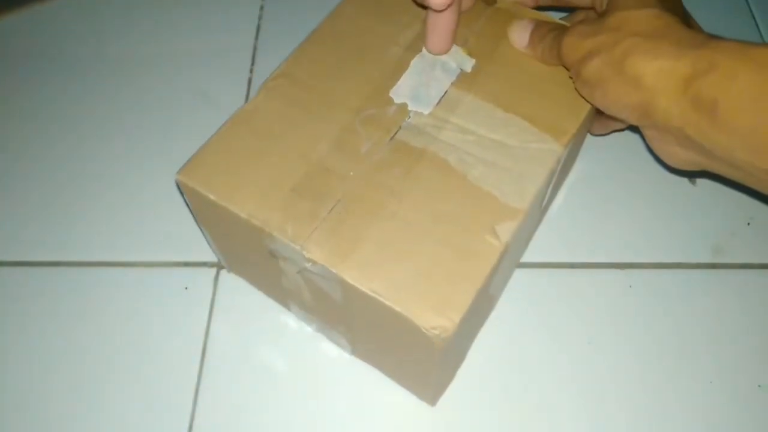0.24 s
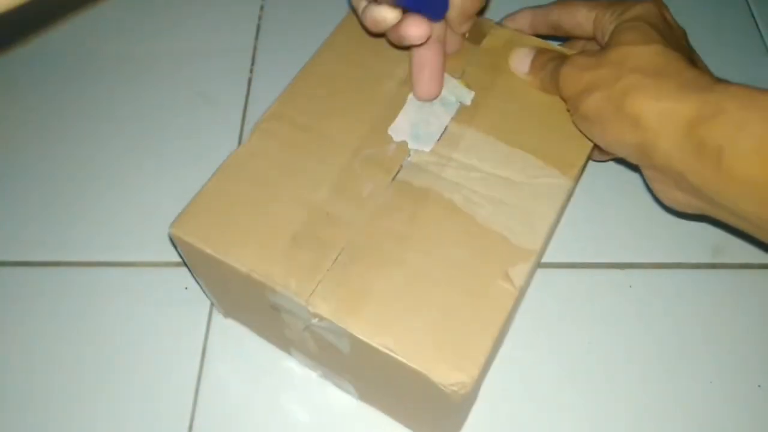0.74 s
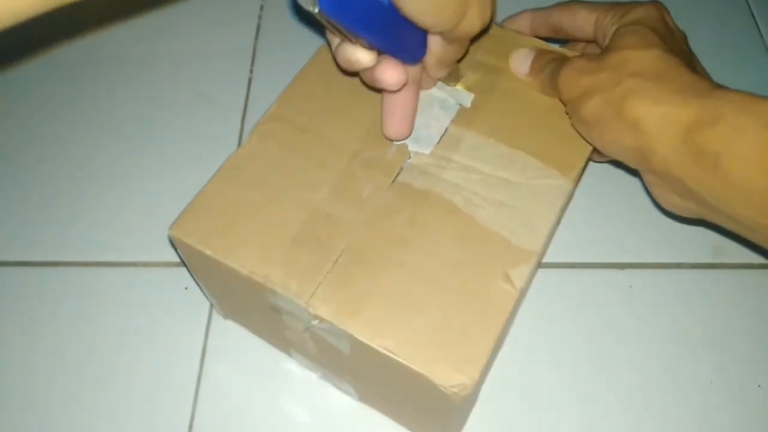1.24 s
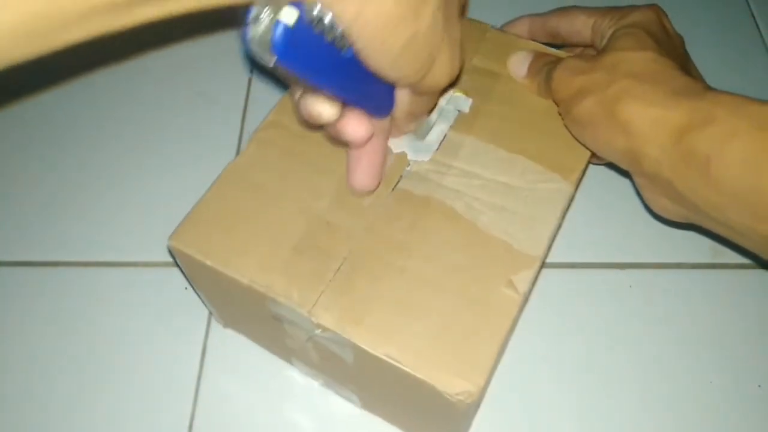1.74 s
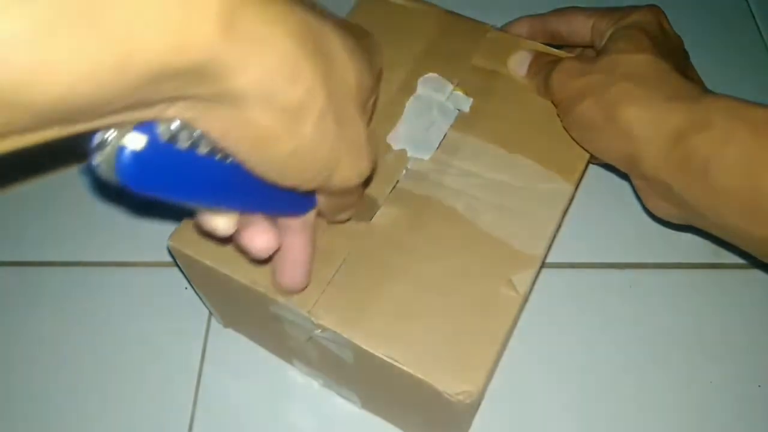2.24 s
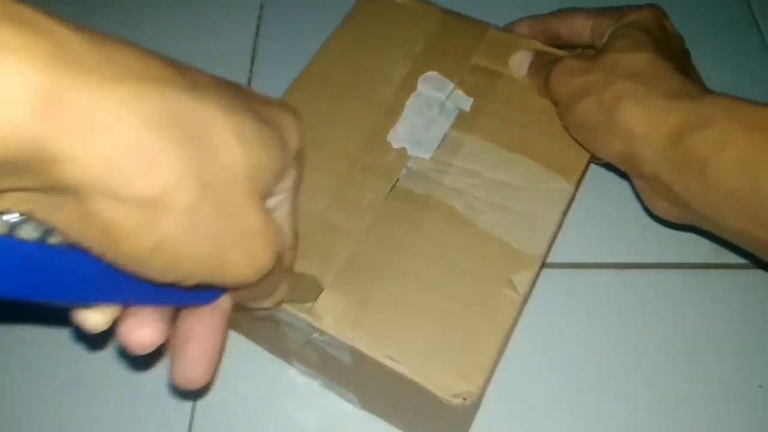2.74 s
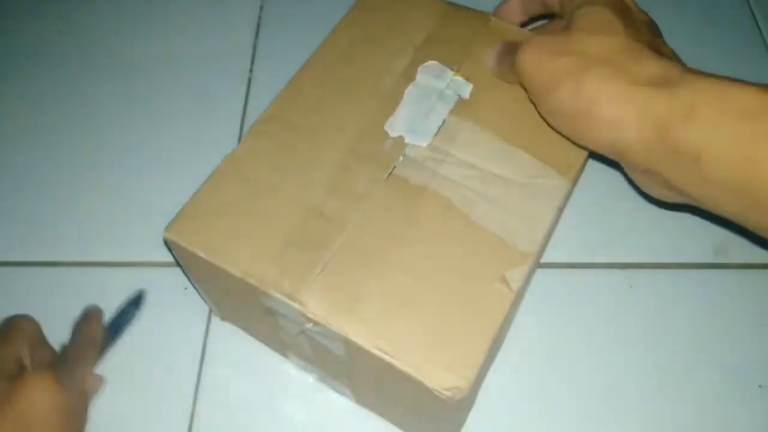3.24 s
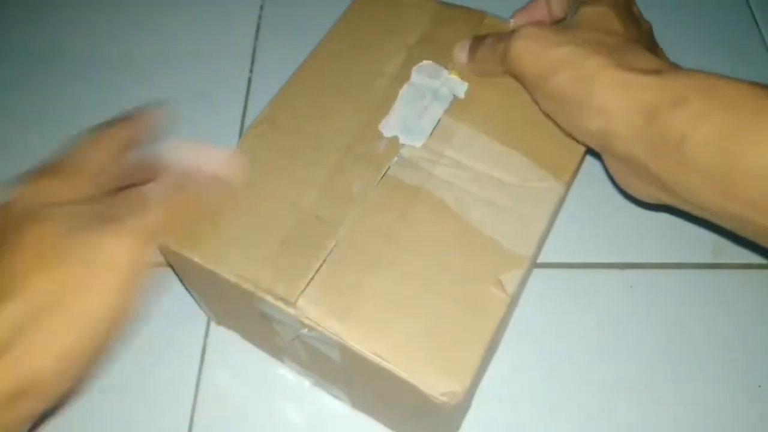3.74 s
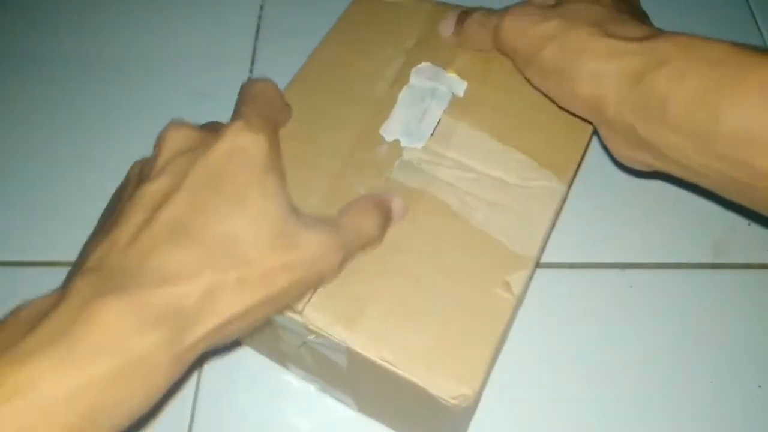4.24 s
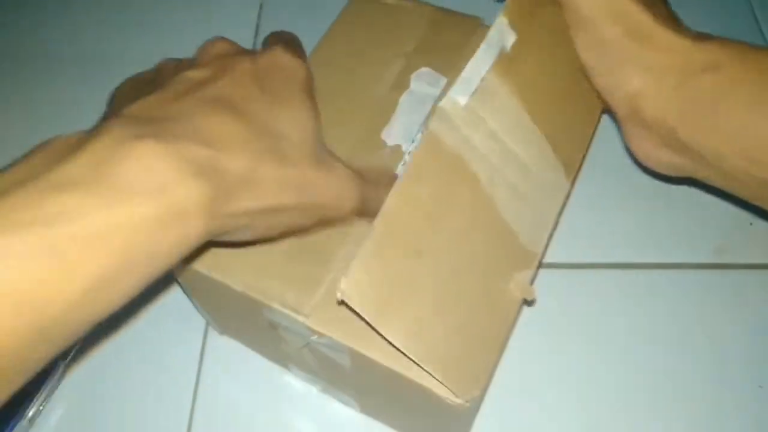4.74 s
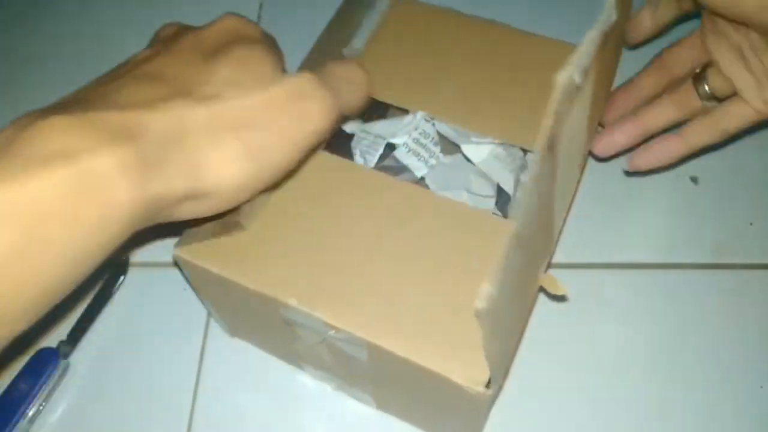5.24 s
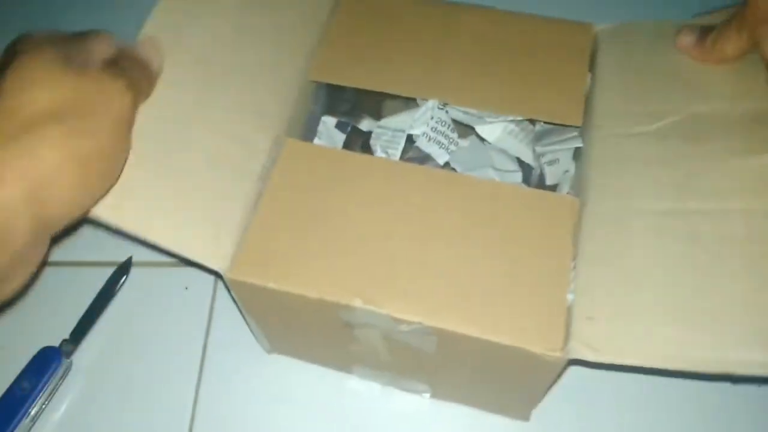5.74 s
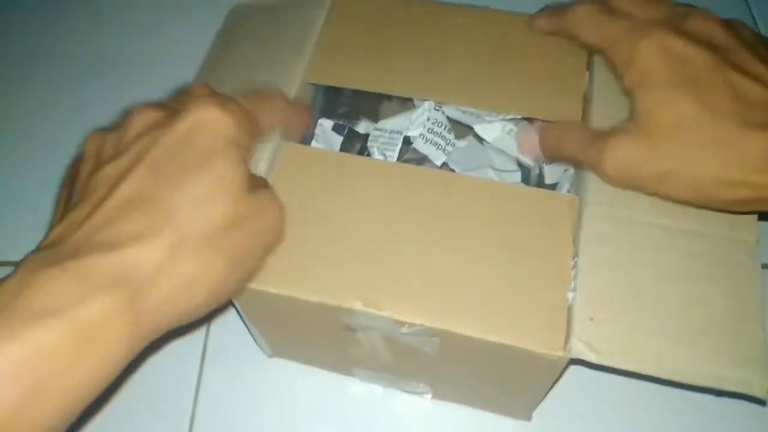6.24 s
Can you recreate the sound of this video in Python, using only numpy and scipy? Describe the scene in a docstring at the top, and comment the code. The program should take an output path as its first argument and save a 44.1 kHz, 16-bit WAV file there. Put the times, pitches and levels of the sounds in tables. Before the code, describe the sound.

Close up in a small, hard tiled room, a knife jabs the taped seam of a hollow cardboard box with dull knocks and crisp snaps, then slits it in coarse, crackling bursts. The blade clicks onto the floor, the last tape gives way with a loud boxy pop, flaps fold back with light papery scrapes, and hands slide across the card. Quiet room noise and a low hum remain.

```python
"""Opening a taped cardboard box

A box is opened on a tiled floor in a small hard room, close to the microphone. A craft knife jabs the tape,
slits the seam and is laid on the tiles; the last tape pops, the flaps fold back and hands slide over the card.
Blows are dying vibrations and noise bursts, friction is a stream of tiny slips, and faint whistling noise
glides in moving resonances. Faint hollow tones, quiet room noise and a low hum lie behind.
"""
import sys
import numpy as np
from scipy import signal
from scipy.fft import rfft, irfft
from scipy.io import wavfile
from scipy.ndimage import uniform_filter1d

SR = 44100
rng = np.random.default_rng(int(sys.argv[2]) if len(sys.argv) > 2 else 0)


def materialize(psi):
    """Save the field psi as 16-bit PCM at rate SR to the path in sys.argv[1].

    A 1-D psi becomes a single channel; in a 2-D psi each row is a channel.
    """
    bounded = np.clip(np.atleast_2d(psi).T, -1, 1)
    quanta = np.round(bounded * 32767).astype(np.int16)
    wavfile.write(sys.argv[1], SR, quanta)


N = 286209  # length of the scene in samples


def knocks(thump_db=-1, panel_db=-1, crack_db=-2, snap_db=0, thump_t60=0.037, deep_hz=200, deep_power=1.2,
           panel_t60=0.013, ring_db=3, edge_hz=2270, edge_t60=0.013, edge_db=1, buckle_db=-32,
           crackle_db=-7, low_room_db=-10, high_room_db=-5):
    """Each blow bends a wall (thump), rings a stiff panel, cracks fibres and snaps tape, amid a crackle."""
    # jabs, pops and bumps, levels before the trims above: [t/s, time the force takes to build/s, thump f/Hz,
    # thump level/dB, panel f/Hz, panel level/dB, crack level/dB, tape snap level/dB]
    blows = [(0.175, 0.0014, 260, -64.5, 567, -71.5, -99, -99),
             (0.325, 0.000064, 273, -89, 690, -81, -57, -63), (0.5494, 0.001, 352, -37, 800, -47, -39, -48),
             (1.094, 0.0038, 230, -47.5, 916, -56, -58, -57),
             (1.176, 0.0029, 239, -50.5, 960, -59, -57, -58.5),
             (1.3169, 0.00013, 396, -54, 835, -41.5, -44, -57),
             (1.325, 0.0024, 276, -46.5, 695, -54, -57, -57.5),
             (1.5458, 0.0009, 233, -39.5, 726, -42.5, -44.5, -46),
             (1.561, 0.002, 286, -41.5, 606, -48, -48.5, -50),
             (1.578, 0.0034, 246, -46.5, 535, -47.5, -52, -50.5),
             (1.99, 0.00044, 232, -42.5, 830, -62, -59, -69),
             (2.1117, 0.00017, 317, -47, 840, -38.5, -43.5, -42),
             (2.121, 0.0021, 205, -43.5, 790, -63, -65, -58),
             (2.216, 0.00067, 424, -47, 800, -52.5, -55.5, -55.5),
             (2.6604, 0.0014, 370, -42, 998, -32, -38, -42),
             (2.759, 0.0025, 403, -44, 993, -35.5, -41, -42.5),
             (2.772, 0.0017, 347, -47, 1018, -36, -44, -47),
             (2.963, 0.0014, 237, -36, 696, -58, -49, -42.5),
             (2.977, 0.0018, 240, -29.5, 814, -59.5, -49.5, -41.5),
             (3.721, 0.00054, 258, -46, 674, -66, -45, -67.5),
             (4.0235, 0.0012, 156, -33, 870, -71, -55, -49),
             (4.371, 0.0009, 326, -40, 753, -46.5, -48, -51),
             (4.387, 0.0011, 383, -41, 600, -59.5, -57.5, -58.5),
             (4.5101, 0.00012, 189, -22.5, 778, -37.5, -32.5, -34),
             (4.528, 0.0031, 140, -31, 465, -43.5, -46.5, -57.5),
             (4.572, 0.0048, 260, -42.5, 534, -54, -57.5, -52.5),
             (4.753, 0.00029, 322, -40, 630, -77, -57, -54), (4.97, 0.0027, 210, -46, 737, -69.5, -61, -63),
             (6.276, 0.0042, 267, -43.5, 820, -52, -59, -68)]
    # colour of cracking cardboard: [f/Hz, relative level/dB]
    crack_colour = [(300, -8), (1000, -6), (1600, -13), (2350, -7), (2900, -16), (3800, -15), (5500, -21.5),
                    (9000, -28.5)]
    # colour of snapping tape: [f/Hz, relative level/dB]
    snap_colour = [(2000, -61), (5000, 3), (10000, 9.5), (13000, 11), (16000, 4.5)]
    low, high, pops = np.zeros((3, N))
    for s, push_s, thump_hz, thump, panel_hz, panel, crack, snap in blows:
        # deep thumps last longer
        decay_s = thump_t60 * (deep_hz / thump_hz) ** deep_power
        blow = amp(thump + thump_db) * ring(thump_hz, decay_s, push_s, sag_share=0.22)
        blow -= amp(panel + panel_db) * ring(panel_hz, panel_t60 + 3 * push_s, push_s, sag_share=0.11)
        add(blow, 0, amp(crack + crack_db) * burst(crack_colour, 0.00039 + 3 * push_s, push_s))
        add(low, s, box(blow, ring_db))
        add(high, s, amp(snap + snap_db) * burst(snap_colour, 0.00018 + 0.48 * push_s, push_s))
        specks = amp(crack) * crackle(crack_colour) + amp(snap) * crackle(snap_colour)
        add(high, s - len(specks) / 2 / SR, amp(crackle_db) * specks)
        # the flap's stiff edge gives a short, dry pop, weakened further when the crack is below buckle_db
        pop_db = crack + edge_db + min(crack - buckle_db, 0)
        add(pops, s, amp(pop_db) * ring(edge_hz, edge_t60, push_s))
    # a small box radiates little deep bass
    low = signal.sosfilt(signal.butter(2, 80, "high", fs=SR, output="sos"), low)
    return ports(low + high + pops) + room(amp(low_room_db) * low + amp(high_room_db) * high)


def ring(hz, t60, rise_s, sag_share=0, sag_s=0.0048):
    """A dying vibration with a soft start; a struck wall slackens, so its pitch can sink through hz."""
    t = np.arange(SR // 3) / SR
    pitch_hz = hz * (1 + sag_share * (np.exp(-t / sag_s) - .5))
    turns = np.cumsum(pitch_hz) / SR
    return unit(np.sin(2 * np.pi * turns) * amp(-60 * t / t60) * (1 - np.exp(-t / rise_s)))


def burst(colour, decay_s, rise_s, size=4096):
    """A swelling, dying spray of dense noise, coloured like a click of the given colour."""
    t = np.arange(size) / SR
    spray = rng.standard_normal(size) * np.exp(-t / decay_s) * (1 - np.exp(-t / rise_s)) ** 2
    return unit(signal.fftconvolve(spray, click(colour))[:size])


def crackle(colour, swell_s=0.0055, fade_s=0.0088, specks_per_s=1500, size=8192):
    """A sparse crackle swells and fades around each blow, which falls in the middle."""
    t = (np.arange(size) - size // 2) / SR
    specks = rng.standard_normal(size) * (rng.random(size) < specks_per_s / SR)
    specks *= np.exp(np.minimum(t / swell_s, -t / fade_s))
    return unit(signal.fftconvolve(specks, click(colour))[:size])


def click(colour, size=4096):
    """One click of the given colour that starts at once, with no sound ahead of it (minimum phase)."""
    log_gain = np.log(amp(read(colour, abs(np.fft.fftfreq(size, 1 / SR)))))
    return unit(np.fft.ifft(np.exp(np.conj(signal.hilbert(log_gain)))).real)


def box(x, ring_db, place_db=1.0, flex_share=0.055):
    """Walls and inside air ring along; random mode levels and pitches stand for the place touched."""
    # ringing modes of the box: [f/Hz, relative level/dB, time to fall by 60 dB/s]
    box_modes = [(127.4, -4, 0.3), (186, -6, 0.078), (291.6, -1.5, 0.1), (406.3, 2, 0.096),
                 (478, 3.5, 0.21), (524, 0.5, 0.47), (746, -6.5, 0.025), (944, -8, 0.074)]
    t = np.arange(SR // 2) / SR
    ringing = np.zeros(len(t))
    for hz, db, t60 in box_modes:
        fade = amp(db + place_db * rng.uniform(0.22, 1) - 60 * t / t60)
        mode_hz = hz * (1 + flex_share * rng.uniform(-1.16, 1))
        ringing += fade * np.cos(2 * np.pi * mode_hz * t) / t60
    # with the division by t60, each mode's resonant gain follows its level, however long it rings
    scale = 2 * np.log(1000) / SR
    return x + amp(ring_db) * scale * signal.fftconvolve(x, ringing)[:len(x)]


def blade():
    """The blade slits the seam; tape fibres part in small bundles, which makes a coarse crackle."""
    # pulls, levels before easing: [t/s, length/s, time to bite/s, box drone level/dB, hiss level/dB]
    pulls = [(1.802, 0.034, 0.0052, -40, -48), (1.866, 0.098, 0.012, -47, -50),
             (2.077, 0.028, 0.0022, -44.5, -49.5), (2.18, 0.25, .02, -77, -101),
             (2.45, 0.58, 0.063, -67, -64.5), (2.625, 0.12, 0.02, -56, -64.5),
             (2.734, 0.027, 0.0046, -54.5, -59), (2.842, 0.058, 0.013, -52.5, -52.5)]
    # colour of cutting: [f/Hz, relative level/dB]
    cut_colour = [(100, -96.5), (175, -1), (290, 15.5), (420, -5), (600, -9), (900, -1), (1420, -17.5),
                  (2380, -12), (3300, -20.5), (4400, -26.5), (7300, -20.5), (12000, -10), (16000, -20.5)]
    strengths = pressed(pulls, ease_db_per_s=2.5, release_s=0.058, rasp_db=-9)
    return friction(strengths, cut_colour, slips_per_s=260, slip_s=0.00084, spread_db=3.0, smooth=0.14,
                    catch_db=2.0, shift_db=1.5, room_db=-1.0)


def rubs():
    """Blade tip, fingers and folding flaps rub the cardboard in short strokes of many brief slips."""
    # strokes, levels before easing: [t/s, length/s, time to bite/s, box drone level/dB, hiss level/dB]
    rub_strokes = [(.485, 0.42, 0.018, -78.5, -62.5), (1.05, 0.21, 0.021, -68, -69),
                   (3.362, 0.0081, 0.0048, -82, -68), (3.54, 0.092, 0.0048, -66.5, -84),
                   (3.78, 0.24, 0.003, -61, -75.5), (4.0, 0.089, 0.007, -69, -62),
                   (4.36, 0.22, 0.0056, -71.5, -60.5), (4.58, 0.13, 0.1, -77, -68.5),
                   (4.96, 0.093, 0.011, -66.5, -53.5), (5.2, 0.099, 0.0088, -89.5, -64),
                   (5.308, 0.0079, 0.0095, -85, -62), (5.41, 0.27, 0.005, -71, -55),
                   (5.803, 0.15, 0.011, -69.5, -50.5), (6.0, 0.14, 0.027, -68.5, -92)]
    # colour of rubbing: [f/Hz, relative level/dB]
    rub_colour = [(100, -3.5), (180, -13), (320, 5.5), (500, -12), (2100, -12.5), (4300, -21.5),
                  (7450, -18.5), (12900, -8), (16000, -18)]
    strengths = pressed(rub_strokes, ease_db_per_s=10.0, release_s=0.027, rasp_db=-11.5)
    return friction(strengths, rub_colour, slips_per_s=890, slip_s=0.0003, spread_db=6.5, smooth=0.22,
                    catch_db=3.0, shift_db=0.5, room_db=1.5)


def hands():
    """Hands slide onto the inner flaps in quick, growing pushes; dense slips make a smoother rub."""
    # pushes, levels before growth: [t/s, length/s, time to bite/s, box drone level/dB, hiss level/dB]
    pushes = [(6.18, .11, 0.038, -69.5, -58.5), (6.235, .055, 0.019, -46.5, -64),
              (6.31, .34, 0.013, -58.5, -66.5)]
    # colour of sliding hands: [f/Hz, relative level/dB]
    slide_colour = [(60, -5), (130, 0.5), (290, -7.5), (535, -22.5), (800, -9), (1550, -13), (3300, -15),
                    (4200, -9.5), (6150, -21), (11900, 8), (16000, 8)]
    strengths = pressed(pushes, ease_db_per_s=-4, release_s=0.014, rasp_db=2.5)
    return friction(strengths, slide_colour, slips_per_s=2100, slip_s=0.0007, spread_db=4.0, smooth=0.71,
                    catch_db=0.5, shift_db=2.0, room_db=-5)


def pressed(strokes, ease_db_per_s, release_s, rasp_db):
    """Strengths of drone, rasp and hiss: each stroke bites, eases off (or grows if negative), lets go."""
    t, out = np.arange(SR) / SR, np.zeros((3, N))
    for s, length_s, bite_s, drone, hiss in strokes:
        force = np.minimum(t / bite_s, 1) ** 2 * amp(-ease_db_per_s * t)
        force *= np.exp(-np.maximum(t - length_s, 0) / release_s)
        # the rasp is set from the midpoint of the other two
        rasp = (drone + hiss) / 2 + rasp_db
        add(out, s, amp([[drone], [rasp], [hiss]]) * force)
    return out


def friction(strengths, colour, slips_per_s, slip_s, spread_db, smooth, catch_db, shift_db, room_db):
    """Stick and slip: uneven little slips, each a short tearing of fibres, shake the box, rasp and hiss."""
    slip_db = spread_db * np.minimum(rng.exponential(1, N), 3)
    energy = amp(slip_db) ** 2 * (rng.random(N) < slips_per_s / SR)
    # each slip's energy dies away within about slip_s
    tearing = evened(np.sqrt(signal.lfilter([1], [1, -np.exp(-1 / (slip_s * SR))], energy)))
    slips = (tearing + smooth) * rng.standard_normal(N)
    # the edge catches and runs free by turns, so the slips come in clumps
    slips *= amp(catch_db * evened(uniform_filter1d(rng.standard_normal(N), size=450)))
    slips = edge_echo(slips)
    # as the contact moves on, drone, rasp and hiss each come and go a little
    drift = evened(uniform_filter1d(rng.standard_normal((3, N)), size=1100, axis=1))
    drone, rasp, hiss = strengths * amp(shift_db * drift)
    sound = drone * evened(box(tint(slips, colour, hi_hz=1360), ring_db=9.0))
    sound += rasp * evened(tint(slips, colour, lo_hz=1470, hi_hz=6200))
    sound += hiss * evened(tint(slips, colour, lo_hz=5270))
    return ports(sound) + amp(room_db) * room(sound)


def edge_echo(x, echo_s=.0011, echo_share=.8, count=170):
    """Each slip comes back from the panel's edge; the delay wanders between one and two times echo_s."""
    n = np.arange(N)
    stretch = np.interp(n, np.linspace(0, N, count), rng.uniform(1, 2, count))
    delay = SR * echo_s * stretch
    return x + echo_share * x[n - delay.astype(int)]


def ticks(tick_db=-1, skirt_db=-12, body_db=-17, low_db=-26, ring_db=-2, ring_t60=0.0073):
    """Small hard contacts: a dry, broad click, brightest around one pitch that rings into the room."""
    # ticks of blade, knife handle and tape, levels before tick_db:
    # [t/s, level/dB, f/Hz, room level against direct/dB, left minus right/dB]
    contacts = [(0.326, -52, 13600, -1.5, -2), (2.9899, -37, 11200, -14.5, -8),
                (3.5946, -33.5, 13000, -5, -7.5), (3.7195, -27.5, 10200, -4, 1.5),
                (4.4266, -35, 11500, -22, -5), (5.8678, -35, 12380, -21, -4.5),
                (3.608, -59.5, 12900, 13.5, -5), (3.739, -37, 12200, 4, -2), (4.126, -56, 11600, -8, 2),
                (4.5013, -39, 13000, -14.5, -5.5), (4.761, -47.5, 12000, -12, 6),
                (5.204, -61, 11160, -2.5, -12.5)]
    near, far = np.zeros((2, N)), np.zeros(N)
    for s, db, hz, room_db, pan_db in contacts:
        colour = [(hz / 8, low_db), (hz / 3.1, body_db), (hz / 1.23, skirt_db), (hz, 0), (hz * 1.49, skirt_db)]
        contact = np.array([burst(colour, decay_s=.0008, rise_s=.0005) for side in range(2)])
        add(near, s, amp(db + tick_db) * amp([[pan_db / 2], [-pan_db / 2]]) * contact)
        far_db = db + tick_db + room_db
        add(far, s, amp(far_db) * click(colour))
        add(far, s, amp(far_db + ring_db) * ring(hz, ring_t60, 1 / hz))
    return near + room(far)


def scuffs(scuff_db=-1, width_share=0.34, grain_db=4, room_db=-4, drone_hz=300, drone_db=-2):
    """Brief, grainy rubs sing in one broad resonance of the flap and make the wall drone."""
    # scuffs of fingers and flap edges, level before scuff_db: [middle t/s, length/s, f/Hz, level/dB]
    brief_rubs = [(0.277, 0.061, 960, -63.5), (0.904, 0.049, 930, -60), (0.898, 0.04, 2660, -61.5),
                  (3.223, 0.092, 750, -73.5), (0.463, 0.13, 433, -71.5), (4.685, 0.032, 1760, -65),
                  (4.686, 0.031, 330, -56.5), (4.984, 0.057, 2020, -53.5), (5.322, 0.02, 2700, -65),
                  (5.425, 0.04, 2030, -61), (5.547, 0.17, 845, -63.5), (5.673, 0.092, 610, -57),
                  (5.837, 0.053, 730, -66), (5.963, 0.14, 846, -56), (6.249, 0.16, 843, -48),
                  (6.444, 0.11, 4040, -55)]
    out = np.zeros(N)
    edges = np.exp([-width_share / 2, width_share / 2])
    for s, length_s, hz, db in brief_rubs:
        size = round(length_s * SR)
        noise, grain = rng.standard_normal((2, SR))
        noise = noise * amp(grain_db * evened(uniform_filter1d(grain, size=200)))
        bands = []
        for centre in (hz, drone_hz):
            band = signal.butter(2, centre * edges, "band", fs=SR, output="sos")
            # the end of the noise is used, where the filter has settled
            bands.append(evened(signal.sosfilt(band, noise)[-size:]))
        rub, drone = bands
        add(out, s - length_s / 2, amp(db + scuff_db) * (rub + amp(drone_db) * drone) * np.hanning(size))
    return ports(out) + amp(room_db) * room(out)


def whistles(direct_db=-4, room_db=-2, wash_db=-12, wash_hz=1800, wash_width_hz=2400, grain_db=0.5,
             squeal_db=-5, squeal_share=0.19, bend=2.2, upper_hz=2390, upper_width_ratio=1.9):
    """Faint, grainy whistling noise swells and fades in a resonance that glides ever faster."""
    # swishes and whistles, levels before the direct and room gains: [t/s, length/s, first f/Hz, last f/Hz,
    # width/Hz, level/dB, upper resonance level against the gliding one/dB]
    glides = [(2.148, 0.75, 1220, 1700, 1210, -67, -20), (2.772, 0.32, 1310, 2520, 880, -52, -28),
              (3.304, 0.4, 1265, 2000, 146, -60, 0.5), (3.445, 0.076, 2604, 2820, 130, -64.5, -27),
              (3.471, 0.35, 1800, 2600, 850, -56.5, -3), (3.759, 0.52, 1290, 1054, 300, -59.5, -12.5)]
    out = np.zeros(N)
    for s, length_s, first_hz, last_hz, width_hz, db, upper_db in glides:
        progress = np.linspace(0, 1, round(length_s * SR)) ** bend
        hz = first_hz * (last_hz / first_hz) ** progress
        steady = np.ones(len(hz))
        noise, grain = rng.standard_normal((2, SR))[:, :len(hz)]
        noise = noise * amp(grain_db * evened(uniform_filter1d(grain, size=250)))
        whistle = resonate(noise, hz, width_hz)
        # a sharper core, a steady upper resonance and a broad wash
        whistle += amp(squeal_db) * resonate(noise, hz, squeal_share * width_hz)
        whistle += amp(upper_db) * resonate(noise, upper_hz * steady, upper_width_ratio * width_hz)
        whistle += amp(wash_db) * resonate(noise, wash_hz * steady, wash_width_hz)
        add(out, s, amp(db) * np.hanning(len(hz)) * whistle)
    return amp(direct_db) * ports(out) + amp(room_db) * room(out)


def resonate(x, hz, width_hz):
    """A steep resonance follows the curve hz: x is shifted down to 0 Hz, smoothed and shifted back."""
    turn = np.exp(2j * np.pi * np.cumsum(hz) / SR)
    r = np.exp(-np.pi * width_hz / SR)
    return evened((turn * signal.lfilter([1], [1, -2 * r, r * r], x / turn)).real)


def tones(width_hz=45, attack_s=0.0018, fuzz_db=-8, fuzz_width_hz=420, direct_db=-6, room_db=-3, count=3,
          sag_hz_per_s=110):
    """Faint, fuzzy, wavering tones sink and fade: noise in narrow resonances at a pitch and its overtones."""
    # hollow tones, levels before the direct and room gains:
    # [t/s, length/s, starting f/Hz, level/dB, overtone slope/dB per octave]
    hollow = [(0, 0.14, 544.6, -60.5, -7), (1.553, 0.85, 597, -68.5, -28), (3.863, 0.94, 626, -61.5, -12.5)]
    out = np.zeros(N)
    for s, length_s, pitch_hz, db, overtone_db in hollow:
        t = np.arange(round(length_s * SR)) / SR
        hz = pitch_hz - sag_hz_per_s * t
        noise = rng.standard_normal(SR)[:len(t)]
        tone = np.zeros(len(t))
        for k in range(1, count + 1):
            partial = resonate(noise, k * hz, width_hz) + amp(fuzz_db) * resonate(noise, k * hz, fuzz_width_hz)
            tone += amp(overtone_db * np.log2(k)) * partial
        add(out, s, amp(db) * np.minimum(t / attack_s, 1) * (1 - t / length_s) * tone)
    return amp(direct_db) * out + amp(room_db) * room(out)


def air(air_db=-74, hum_hz=62, hum_width_hz=9, hum_db=-71, own_db=-6):
    """Quiet room noise, its bass partly shared by both sides, with a low unsteady hum."""
    # colour of the quiet room: [f/Hz, relative level/dB]
    air_colour = [(20, -16), (70, -4), (130, -5), (600, -16), (2400, -24), (4700, -34), (13000, -32),
                  (16000, -35)]
    hz = np.fft.rfftfreq(N, 1 / SR)
    hum = evened(irfft(rfft(rng.standard_normal(N)) / (1 + ((hz - hum_hz) / hum_width_hz) ** 2), N))
    bass_noise = rng.standard_normal(N) + amp(own_db) * rng.standard_normal((2, N))
    bass = tint(bass_noise, air_colour, hi_hz=694)
    treble = tint(rng.standard_normal((2, N)), air_colour, lo_hz=696)
    return amp(air_db) * evened(bass + treble) + amp(hum_db) * hum


def ports(x, scatter_db=-4, scatter_s=0.0008, scatter_hz=1200, count=3):
    """Sound reaches the left port count samples late; hands and tiles scatter treble differently to each."""
    colour = [(scatter_hz / 4, -22), (scatter_hz, 0)]
    scatter = np.array([burst(colour, scatter_s, rise_s=0.0033) for port in range(2)])
    scatter *= amp(scatter_db) / np.linalg.norm(scatter[0])
    direct = np.array([np.pad(x, (count, 0))[:N], x])
    return direct + signal.fftconvolve(x[None], scatter, axes=1)[:, :N]


def room(x, build_s=0.00055, alike_hz=750, alike_most=0.85, size=256):
    """Diffuse tail of noise, each band dying at its own speed; the bass is much alike at both ports."""
    # the room's tail: [f/Hz, time to fall by 60 dB/s]
    room_t60 = [(120, 0.32), (400, 0.24), (1000, 0.28), (2500, 0.39), (11000, 0.23), (16000, 0.19)]
    hz, t, z = signal.stft(rng.standard_normal((2, SR // 2)), SR, nperseg=size)
    alike = (min(alike_most, 1) / (1 + (hz / alike_hz) ** 4))[:, None]
    z[1] = alike * z[0] + np.sqrt(1 - alike ** 2) * z[1]
    z *= amp(-60 * t / read(room_t60, hz)[:, None]) * (1 - np.exp(-t / build_s))
    tail = signal.istft(z, SR, nperseg=size)[1]
    return signal.fftconvolve(x[None], tail / np.linalg.norm(tail[0]), axes=1)[:, :N]


def tint(x, colour, lo_hz=1, hi_hz=SR):
    """Gives x a colour and keeps one soft-edged band of it."""
    hz = np.fft.rfftfreq(x.shape[-1], 1 / SR) + 1
    band = ((1 + (lo_hz / hz) ** 10) * (1 + (hz / hi_hz) ** 10)) ** -.5
    return irfft(rfft(x) * amp(read(colour, hz)) * band, x.shape[-1])


def read(points, hz):
    """Reads a table of (Hz, value) on a log-frequency axis."""
    f, value = np.transpose(points)
    return np.interp(np.log(hz + 1), np.log(f + 1), value)


def add(mix, s, sound):
    """Adds a sound into the mix at time s."""
    part = mix[..., max(round(s * SR), 0):][..., :sound.shape[-1]]
    part += sound[..., :part.shape[-1]]


def amp(db):
    """Decibels to gain."""
    return 10 ** (np.asarray(db) / 20)


def evened(x):
    """Scales to rms 1."""
    return x / np.sqrt(np.mean(x ** 2) + 1e-20)


def unit(x):
    """Scales a short sound to the energy of 10 ms at rms 1."""
    return x * np.sqrt(SR / 100 / (np.sum(x ** 2) + 1e-20))


def scene():
    """Knife, box and hands in the room, with the faint background."""
    opening = knocks() + blade() + rubs() + hands() + ticks() + scuffs()
    return opening + whistles() + tones() + air()


def record(dry):
    """The recorder's band limit: a steep filter removes the treble above about 15.9 kHz."""
    low_pass = signal.firwin(255, 15900, window=("kaiser", 8), fs=SR)
    return signal.oaconvolve(dry, low_pass[None], "same", axes=1)


dry = scene()
out = record(dry)
materialize(out)
```